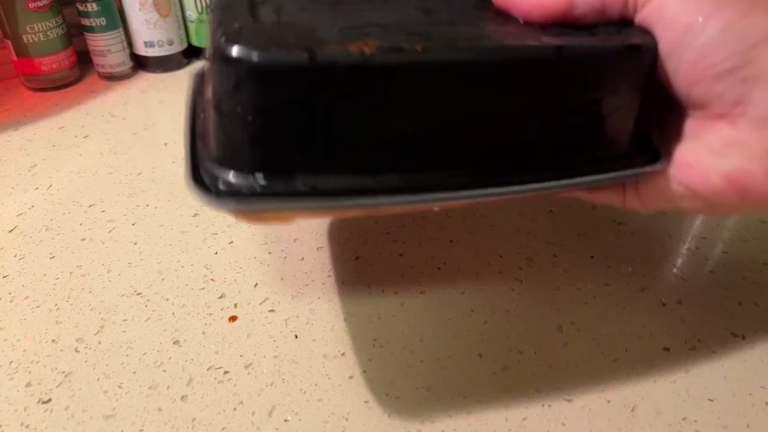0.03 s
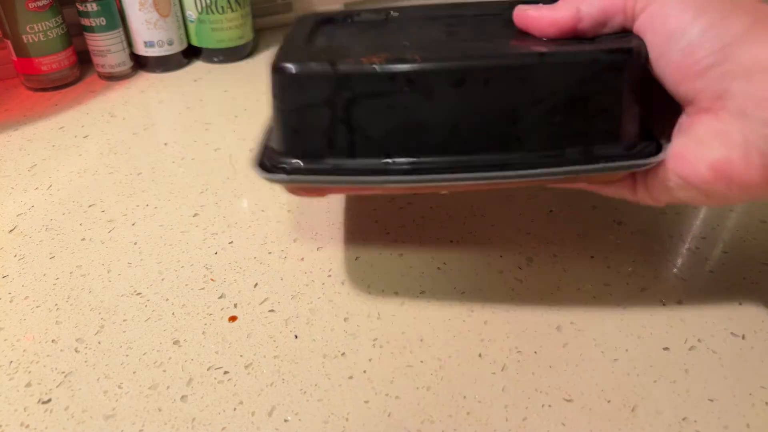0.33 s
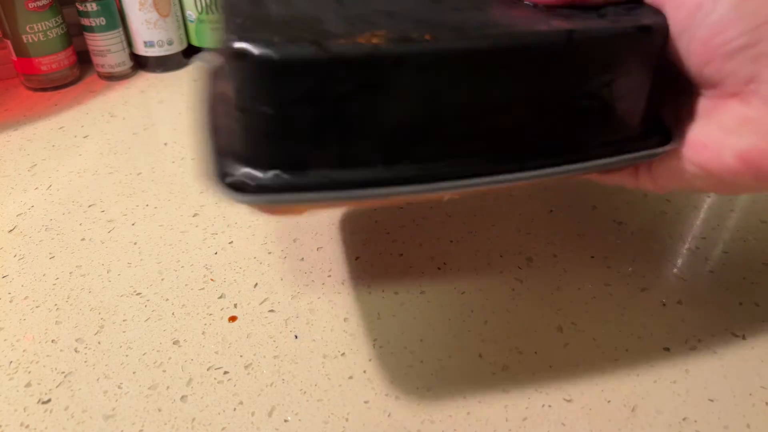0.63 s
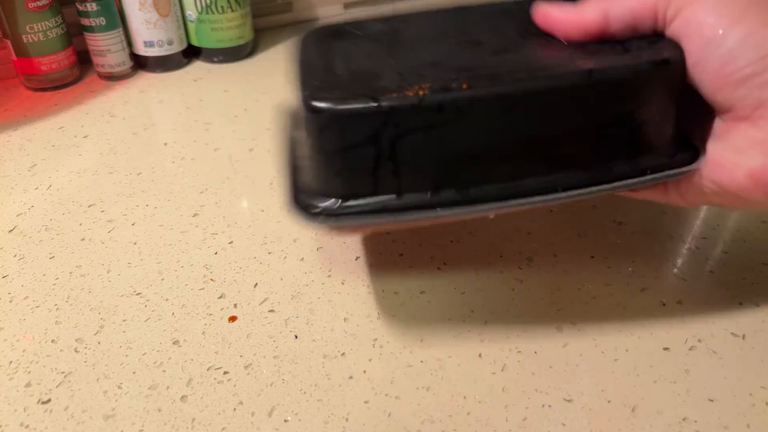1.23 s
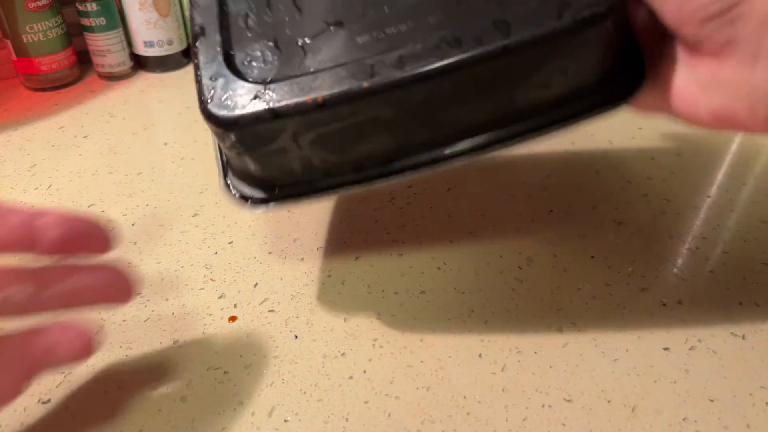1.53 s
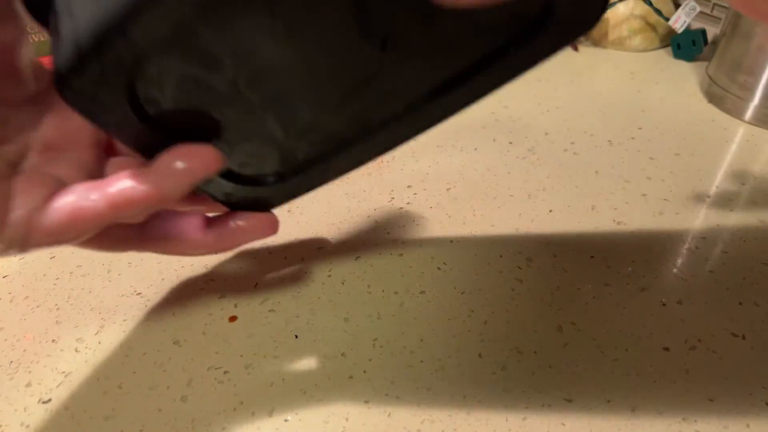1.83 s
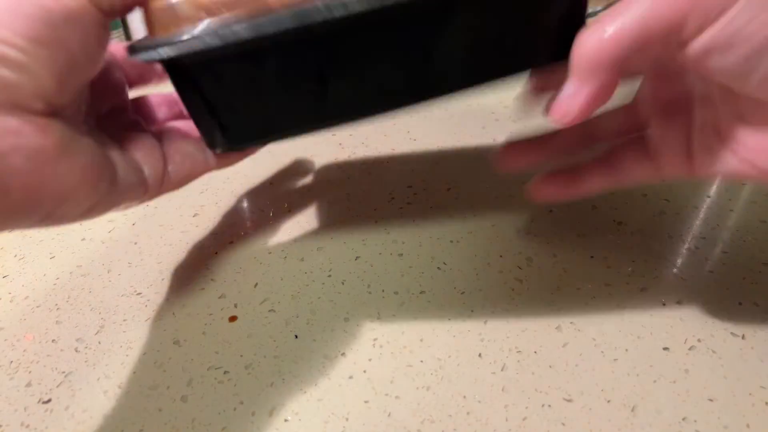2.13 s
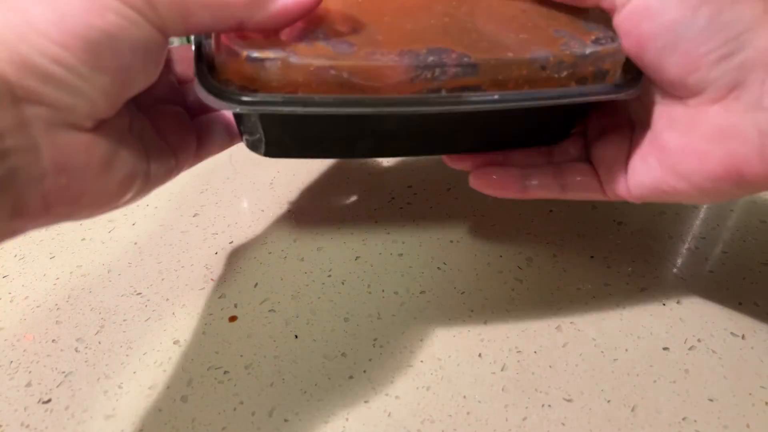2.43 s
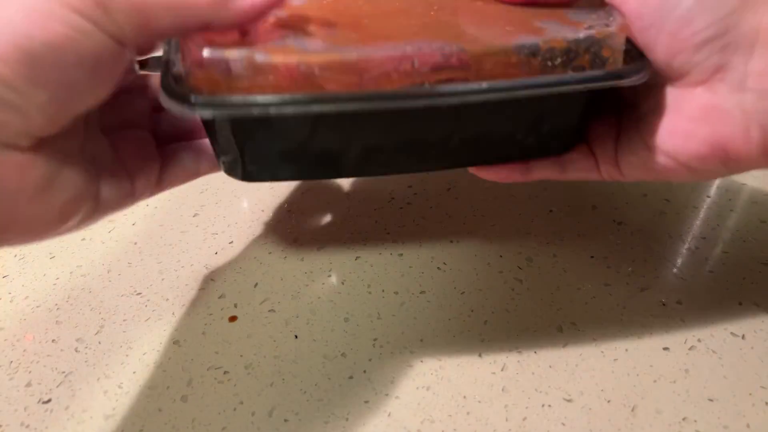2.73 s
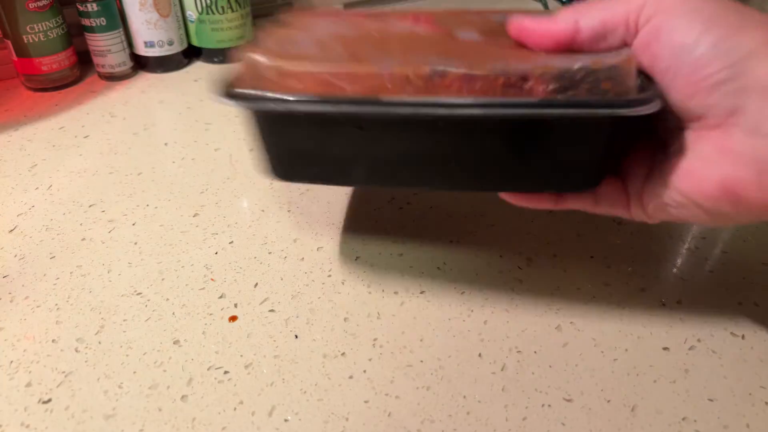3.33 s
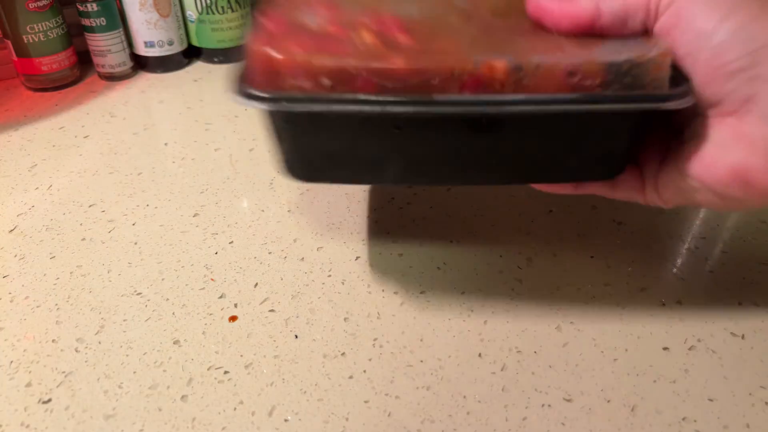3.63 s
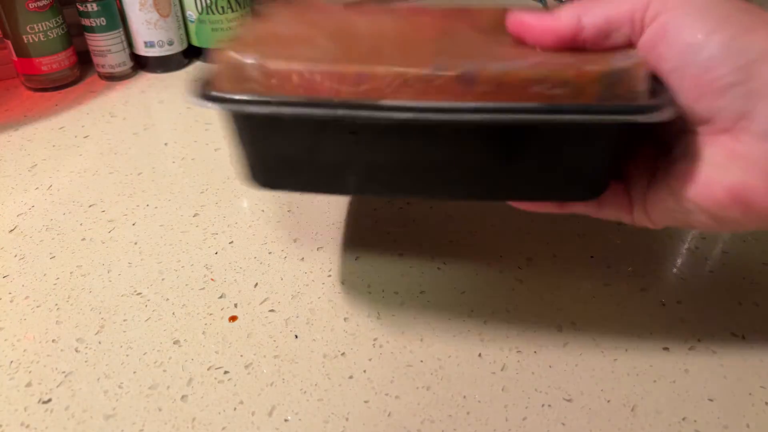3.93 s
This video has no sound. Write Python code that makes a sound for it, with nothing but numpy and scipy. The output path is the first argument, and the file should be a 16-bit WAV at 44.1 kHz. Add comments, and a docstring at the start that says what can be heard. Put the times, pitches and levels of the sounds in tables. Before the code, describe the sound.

Marinade sloshes in a shaken plastic container, close up, about five strokes a second, with gurgles, pops and hollow knocks of meat against the walls. At about 1.4 seconds the shaking stops, leaving a faint hiss and a soft, dull shift of meat near 1.9 seconds. The sloshing and knocking resume around 2.9 seconds and continue to about 4 seconds. A faint kitchen hum lies underneath.

```python
"""Shaking meat in marinade

A small kitchen, one microphone close to the counter. A lidded plastic box is shaken by hand, about five
strokes a second, turned over in a pause, and shaken again. At each end of a stroke the liquid slaps a
wall in gurgles, gulps, pops and spray, and the meat knocks against the plastic, ringing the hollow box.
Behind it, the room hums and hisses faintly."""
import sys
import numpy as np
from scipy import signal
from scipy.fft import rfft, irfft
from scipy.io import wavfile
from scipy.ndimage import map_coordinates

SR = 44100
rng = np.random.default_rng(int(sys.argv[2]) if len(sys.argv) > 2 else 0)


def master(y):
    """Save y as 16-bit WAV."""
    cut = np.clip(np.atleast_2d(y).T, -1, 1)
    pcm = np.round(cut * 32767)  # scale
    wavfile.write(sys.argv[1], SR, pcm.astype(np.int16))


N = 176400

# room tone: (frequency [Hz], relative level [dB])
AIR_SPECTRUM = [(37, -40), (54, -12.5), (72, -10.5), (95, -8), (170, -16.5), (210, -11.5), (275, -4.5),
                (360, -6), (460, -16.5), (1160, -25.5), (2200, -38.5), (3500, -41.5), (7000, -56),
                (16000, -72.5)]
# appliance hum: (frequency [Hz], level [dB])
HUM_TONES = [(59.3, -51), (134.5, -53.5), (269, -51.5)]
# faint hiss while the box is turned: (time [s], level [dB])
HISS_LEVELS = [(1.4, -90), (1.7, -66.5), (1.95, -64.5), (2.2, -63.5), (2.4, -77), (2.7, -102)]
# colour of that hiss: (frequency [Hz], relative level [dB])
HISS_SPECTRUM = [(2500, -11.5), (4700, -5.5), (5500, 3.5), (6900, -7.5), (8400, -1), (12400, -9),
                 (16000, -16.5)]
# comb made by its bounce off the turning box: (time [s], peak spacing [Hz])
HISS_COMB = [(1.68, 1742), (2.15, 2070)]
# kitchen reverberation: (frequency [Hz], t60 [s])
KITCHEN_DECAY = [(150, 0.29), (500, 0.31), (2000, 0.29), (6000, 0.307), (15000, 0.22)]
# resonances of box and lid: (frequency [Hz], t60 [s], gain [dB])
BOX_MODES = [(340.37, 0.19, 5.5), (558, 0.13, -3), (769, 0.07, 6), (1117.4, 0.099, -2.5),
             (1473.5, 0.054, 1), (2282, 0.055, -2.5), (2850, 0.19, -11)]
# wet fingers on the lid: (time [s], relative level [dB])
FINGER_TICKS = [(2.712, -63), (2.806, -61)]
# meat shifting during the turn: (time [s], relative level [dB])
MEAT_SHIFTS = [(1.898, -44.5), (1.955, -43)]
# meat hitting a wall, relative levels: (time [s], pitch [Hz], knock [dB], thud [dB])
MEAT_KNOCKS = [(0, 466, -26, -39.5), (0.087, 320, -20, -41), (0.164, 293, -26, -36.5),
               (0.279, 307, -17, -31), (0.311, 335, -27, -42), (0.473, 330, -14.5, -35.5),
               (0.4905, 345, -22.5, -30), (0.559, 341, -25.5, -41.5), (0.659, 359.6, -16, -28.5),
               (0.854, 306, -25, -39), (1.035, 356, -25.5, -30.5), (1.06, 312, -22.5, -34),
               (1.221, 348, -23, -27), (1.244, 334, -26, -47.5), (3.049, 336, -23.5, -30.5),
               (3.118, 336.5, -22.5, -32), (3.234, 308, -21.5, -44), (3.627, 285, -30, -35),
               (3.815, 312, -24, -26.5), (3.913, 340, -27.5, -29.5)]
# sauce on bare plastic: (time [s], band centre [Hz], relative level [dB])
SAUCE_SPLATS = [(0.080, 11440, -31), (0.275, 8000, -41), (0.367, 5970, -40), (0.447, 4000, -43),
                (0.659, 2560, -29), (0.938, 5000, -38), (1.404, 4940, -33)]
# air pockets closing, deep gulps to small pops: (time [s], pitch [Hz], relative level [dB])
AIR_POCKETS = [(0.274, 2194, -23), (0.297, 792, -27), (0.470, 2175, -22), (0.471, 1395, -24),
               (0.654, 610, -26.5), (0.674, 1140, -24), (1.197, 1236, -30), (1.303, 423, -22.5),
               (1.307, 555, -20.5), (1.436, 406, -21.5), (2.927, 458, -22), (2.930, 576.5, -20.5),
               (3.013, 804, -29), (3.042, 1073, -18), (3.048, 1644, -20), (3.113, 1840, -21),
               (3.201, 2230, -32), (3.269, 488, -17), (3.813, 4450, -23)]
# colour of the liquid in the box: (frequency [Hz], relative level [dB])
LIQUID_SPECTRUM = [(110, -10), (200, -13), (300, -7), (540, -9.5), (700, -20.5), (900, -16.5), (1400, -20),
                   (2200, -24), (2600, -25.5), (4500, -24.5), (8000, -29), (12000, -34), (16000, -38)]
# three sizes of grain in a slosh:
# (lowest [Hz], highest [Hz], rate [1/s], ring [cycles], level spread [dB], slosh fade [s], gain [dB])
GURGLE_GRAINS = (121.5, 577, 900, 3, 0, 0.01, 0.5)
BUBBLE_GRAINS = (604, 3025, 2600, 5.2, 3.65, 0.015, 0.76)
SPRAY_GRAINS = (2898, 17300, 8000, 3.29, 2.7, 0.013, 1.8)
# liquid hitting a wall, relative levels: (time [s], rise [s], gurgle [dB], bubbles [dB], spray [dB])
WALL_SLOSHES = [(0, 0.003, -33, -35.5, -41.5), (0.078, 0.0072, -34, -33, -35.5),
                (0.098, 0.0081, -28, -34.5, -45), (0.149, 0.038, -47, -36.5, -43.5),
                (0.253, 0.028, -32.5, -31, -37), (0.299, 0.0078, -31, -36, -44),
                (0.357, 0.0119, -33.5, -37.5, -39), (0.391, 0.013, -42, -39.5, -58.5),
                (0.456, 0.01704, -28, -31, -35), (0.534, 0.028, -42, -37.5, -41),
                (0.591, 0.0151, -46, -41.5, -46), (0.638, 0.0054, -34.5, -36.5, -44),
                (0.652, 0.01, -28, -25, -35), (0.733, 0.0163, -31, -32.5, -37.5),
                (0.79, 0.0077, -48, -58.5, -45.5), (0.825, 0.0225, -28.5, -33.5, -35),
                (0.875, 0.011, -29, -36.5, -44.5), (0.929, 0.012, -39, -41, -41),
                (1.012, 0.022, -29.5, -35.5, -39.5), (1.055, 0.006, -34, -32.5, -45.5),
                (1.102, 0.0118, -32.5, -36.5, -42), (1.195, 0.027, -33.5, -31, -38.5),
                (1.243, 0.0085, -42, -58.5, -45.5), (1.292, 0.0151, -31.5, -35.5, -35.5),
                (1.341, 0.0045, -42.5, -62, -44), (1.4, 0.00835, -53, -37, -40),
                (2.919, 0.01, -31.5, -35, -40.5), (2.956, 0.0039, -53, -42, -46.5),
                (3.013, 0.023, -39.5, -40, -54), (3.031, 0.014, -31.5, -31.5, -37),
                (3.11, 0.0079, -37, -34, -37), (3.139, 0.0113, -38, -38, -40),
                (3.219, 0.018, -35, -31, -37), (3.304, 0.012, -36, -33.5, -37.5),
                (3.338, 0.0071, -34, -42, -43.5), (3.413, 0.021, -35, -39.5, -43.5),
                (3.498, 0.0072, -49, -38.5, -43), (3.522, 0.015, -42, -40, -42),
                (3.606, 0.0221, -42.5, -36.5, -37.5), (3.706, 0.0094, -36, -36.5, -40.5),
                (3.744, 0.0076, -55, -63, -42.5), (3.809, 0.0058, -32.5, -35, -34),
                (3.895, 0.024, -40.5, -40.5, -42.5)]
# the sauce keeps bubbling between strokes: (start [s], end [s])
CHURN_SPANS = [(0, 1.38), (3.03, 3.93)]


def amp(db):
    """Decibels to gain."""
    return 10 ** (np.asarray(db) / 20)


def unit_rms(x):
    """Scales to rms 1."""
    return x / np.sqrt(np.mean(x ** 2) + 1e-20)


def value_at(points, hz):
    """Reads a table on a log-frequency axis."""
    table_hz, value = np.transpose(points)
    return np.interp(np.log(hz + 1), np.log(table_hz + 1), value)


def coloured(x, spectrum):
    """Filters x by a spectrum and scales it to rms 1."""
    gain = amp(value_at(spectrum, np.fft.rfftfreq(N, 1 / SR)))
    return unit_rms(irfft(rfft(x) * gain, N))


def add(mix, start_s, sound):
    """Mixes a sound in at its start time."""
    part = mix[max(0, round(start_s * SR)):][:len(sound)]
    part += sound[:len(part)]


def room_tone(air_db=-43):
    """The bed behind the box: fan-like air and the steady hum of an appliance."""
    t = np.arange(N) / SR
    hum = sum(amp(db) * np.sqrt(2) * np.sin(2 * np.pi * (hz * t + rng.random())) for hz, db in HUM_TONES)
    return amp(air_db) * coloured(rng.standard_normal(N), AIR_SPECTRUM) + hum


def passing_hiss(bounce_gain=0.25):
    """A faint hiss reaches the microphone directly and off the turning box, so its peaks slide."""
    t = np.arange(N) / SR
    direct = coloured(rng.standard_normal(N), HISS_SPECTRUM)
    delay_samples = SR / np.interp(t, *np.transpose(HISS_COMB))
    bounce = map_coordinates(direct, [np.arange(N) - delay_samples])
    level = amp(np.interp(t, *np.transpose(HISS_LEVELS)))
    return level * unit_rms(direct + bounce_gain * bounce)


def reflections(count=10, near_s=0.011, near_db=-7, tail_db=-6.5, low_cut_hz=415):
    """From one position: close echoes off counter and cupboards, then a short tail."""
    length = SR // 2
    build_up = np.minimum(np.arange(length) / SR / near_s, 1)
    taps = rng.standard_normal(length) * (rng.random(length) < .15) * build_up
    hz, t, spectra = signal.stft(taps, SR, nperseg=256)
    decay = amp(-60 * t / value_at(KITCHEN_DECAY, hz)[:, None])
    tail = signal.istft(spectra * decay, SR, nperseg=256)[1]
    near = np.zeros(len(tail))
    signs = rng.choice([-1, 1], count)
    arrivals = (rng.uniform(.1, 1, count) * near_s * SR).astype(int)
    near[arrivals] = signs / np.sqrt(count)
    echoes = amp(tail_db) * tail / np.linalg.norm(tail) + amp(near_db) * near
    return signal.lfilter(*signal.butter(2, low_cut_hz, "high", fs=SR), echoes)


def kitchen_echoes(x, positions=9, move_s=0.09):
    """The moving box passes from one set of reflections to the next."""
    out, position = np.zeros(N), np.arange(N) / SR / move_s
    for k in range(positions):
        crossfade = np.sin(np.pi / 2 * np.minimum((position - k) % positions, 2))
        out += signal.fftconvolve(x * crossfade, reflections())[:N]
    return out


def box_ring(x):
    """The hollow box and its lid ring after everything that strikes them."""
    out = np.zeros(N)
    for hz, t60, db in BOX_MODES:
        radius = np.exp(-np.log(1000) / t60 / SR)
        pole = radius * np.exp(2j * np.pi * hz / SR)
        out += 2 * amp(db) * signal.lfilter([1 - radius], [1, -pole], x).real
    return out


def bubble_stream(low_hz, high_hz, per_s, cycles, spread_db, sizes=36, flurry_s=0.012):
    """Tiny bubbles, each a short dying tone that rises a little; like sizes come in flurries."""
    out, flurry_index = np.zeros(N), np.arange(N) / SR / flurry_s
    for group_hz in np.geomspace(low_hz, high_hz, sizes).reshape(-1, 6):
        flurry = amp(3 * np.interp(flurry_index, np.arange(N), rng.uniform(-1.77, 1.8, N)))
        for hz in group_hz:
            periods = np.arange(int(2 * cycles * SR / hz) + 2) * hz / SR
            envelope = (1 - np.exp(-4 * periods)) * np.exp(-3 * periods / cycles)
            ring = envelope * np.sin(2 * np.pi * periods * (1 + 0.027 * periods / cycles))
            level_db = spread_db * np.minimum(rng.exponential(1, N), 4)
            strength = flurry * amp(level_db) * rng.choice([-1, 1], N)
            onsets = rng.random(N) < per_s / sizes / SR
            out += hz * signal.oaconvolve(strength * onsets, ring)[:N]
    return coloured(out, LIQUID_SPECTRUM)


def finger_ticks(decay_s=0.006):
    """Wet fingers make tiny sticky ticks as the grip changes."""
    level, t = np.zeros(N), np.arange(SR // 10) / SR
    for start, db in FINGER_TICKS:
        add(level, start, amp(db) * np.exp(-t / decay_s))
    return level * bubble_stream(*SPRAY_GRAINS[:5])


def meat_shifts(decay_s=0.012, band_hz=(140, 414)):
    """The meat slides and settles dully as the box is turned over."""
    level, age = np.zeros(N), np.arange(SR // 5) / SR / decay_s
    for start, db in MEAT_SHIFTS:
        add(level, start, amp(db) * np.sqrt(2 * age) * np.exp(.5 - age))
    rub = signal.lfilter(*signal.butter(1, band_hz, "band", fs=SR), rng.standard_normal(N))
    return level * unit_rms(rub)


def meat_knocks(knock_s=0.0027, glide=0.17, thud_hz=178.1, thud_s=0.00487):
    """Soft blows on the wall: a few hollow cycles, falling in pitch, over a low thud."""
    out, t = np.zeros(N), np.arange(SR // 10) / SR
    knock_age, thud_age = t / knock_s, t / thud_s
    for start, hz, knock_db, thud_db in MEAT_KNOCKS:
        pitch_hz = hz * (1 + glide * (np.exp(-knock_age / 2) - .5))
        phase = 2 * np.pi * np.cumsum(pitch_hz) / SR
        knock = amp(knock_db) * knock_age ** 2 / 4 * np.exp(2 - knock_age) * np.sin(phase)
        thud = amp(thud_db) * thud_age * np.exp(1 - thud_age) * np.sin(2 * np.pi * thud_hz * t)
        add(out, start - knock_s / 2, knock + thud)
    return out


def splats(rise_s=0.0017, half_width_octaves=0.63):
    """A sheet of sauce bursts on the wall: a sudden, bright crack."""
    out, t = np.zeros(N), np.arange(SR // 10) / SR
    hz = np.fft.rfftfreq(len(t), 1 / SR) + 1
    envelope = t / rise_s * np.exp(1 - t / rise_s)
    for start, centre_hz, db in SAUCE_SPLATS:
        band = 1 / (1 + (np.log2(hz / centre_hz) / half_width_octaves) ** 2)
        burst = unit_rms(irfft(rfft(rng.standard_normal(len(t))) * band, len(t)))
        add(out, start, amp(db) * envelope * burst)
    return out


def air_pockets(rise_s=0.0013, climb_per_s=4.8):
    """Each trapped pocket of air rings briefly, climbing in pitch; deeper ones ring longer."""
    out, t = np.zeros(N), np.arange(SR // 10) / SR
    for start, hz, db in AIR_POCKETS:
        decay_s = 0.0058 * np.sqrt(1010 / hz)
        envelope = (1 - np.exp(-t / rise_s)) * np.exp(-t / decay_s)
        phase = 2 * np.pi * np.cumsum(hz * (1 + climb_per_s * t)) / SR
        add(out, start, amp(db) * envelope * np.sin(phase))
    return out


def sloshes(trickle_db=-9, trickle_s=0.044):
    """Liquid slaps a wall, dies quickly and trickles back, in three sizes of grain over a steady churn."""
    out, t = np.zeros(N), np.arange(SR // 3) / SR
    for k, (*grain, fade_s, gain_db) in enumerate([GURGLE_GRAINS, BUBBLE_GRAINS, SPRAY_GRAINS]):
        power = np.zeros(N)
        for start, rise_s, *levels_db in WALL_SLOSHES:
            swell = np.minimum(t / rise_s, 1) ** 0.85
            since_peak = np.maximum(t - rise_s, 0)
            fall = np.exp(-since_peak / fade_s) + amp(trickle_db) * np.exp(-since_peak / trickle_s)
            add(power, start, (amp(levels_db[k] + gain_db) * swell * fall) ** 2)
        out += np.sqrt(power) * bubble_stream(*grain)
    now = np.arange(N) / SR
    shaking = sum(np.clip(np.minimum(now - start, end - now) / trickle_s, 0, 1)
                  for start, end in CHURN_SPANS)
    churn = amp(-51) * shaking * bubble_stream(*BUBBLE_GRAINS[:5])
    return out + churn


def scene():
    """The shaken box up close, the kitchen behind it, in mono."""
    contents = sloshes() + air_pockets() + splats() + meat_knocks() + meat_shifts() + finger_ticks()
    shaken_box = contents + box_ring(contents) + kitchen_echoes(contents)
    return (amp(-2.5) * shaken_box + room_tone() + passing_hiss())[None]


def record(dry):
    """The recorder cuts off steeply near 16 kHz."""
    low_pass = signal.firwin(511, 15950, window=("kaiser", 9), fs=SR)
    return signal.oaconvolve(dry, low_pass[None], "same")


dry = scene()
out = record(dry)
master(out)
```